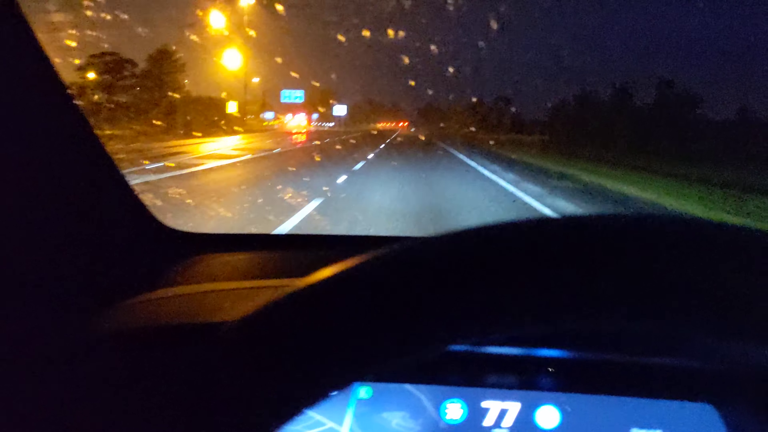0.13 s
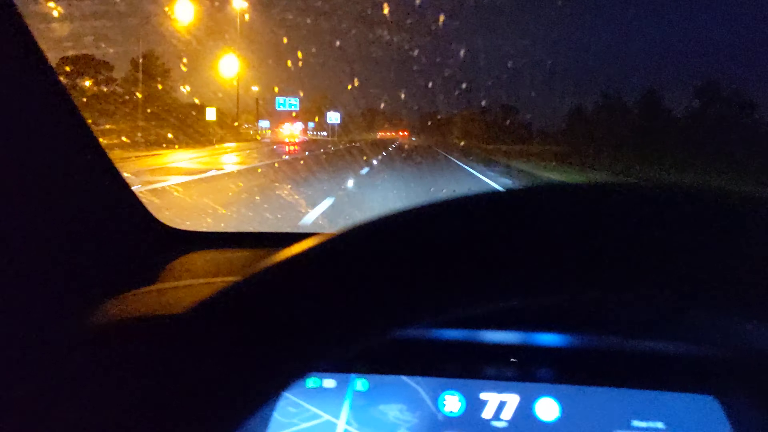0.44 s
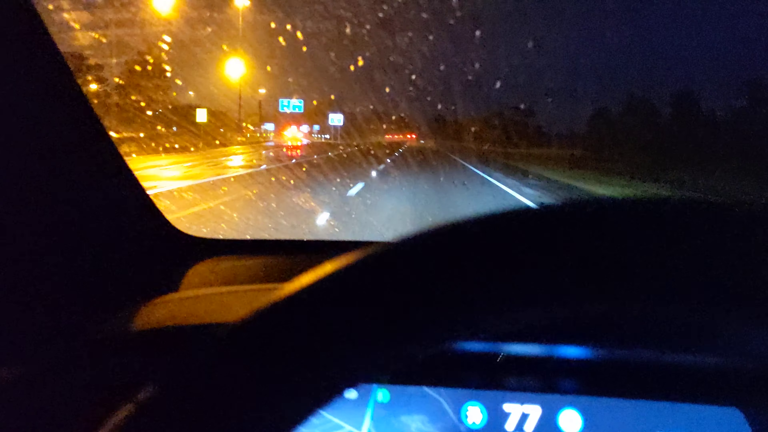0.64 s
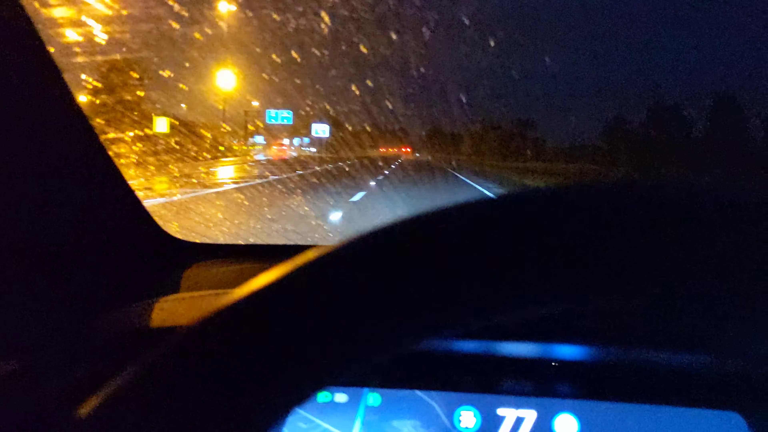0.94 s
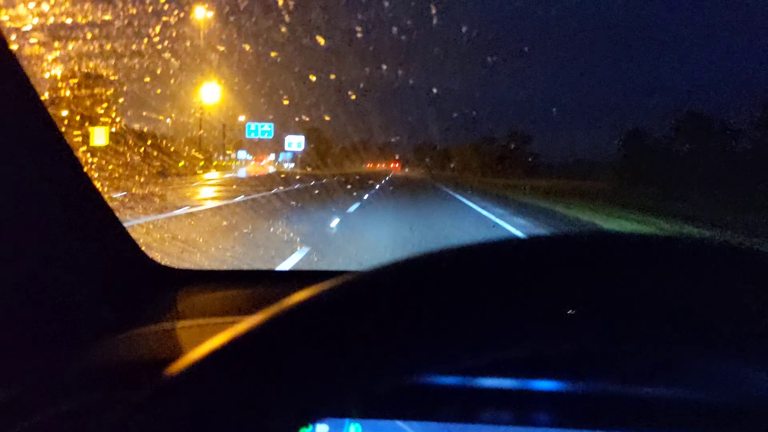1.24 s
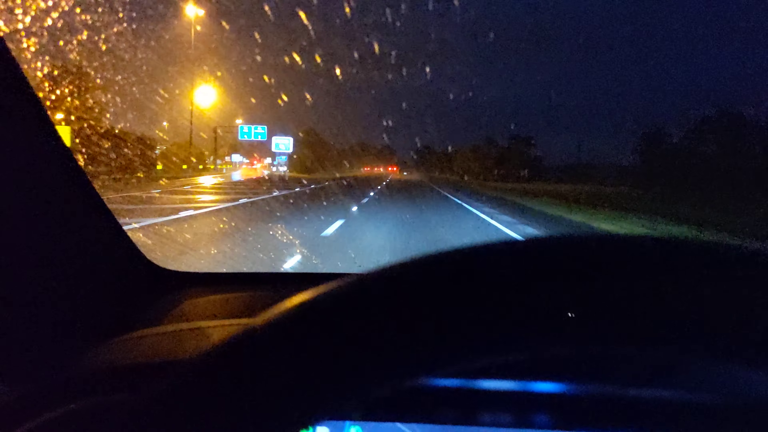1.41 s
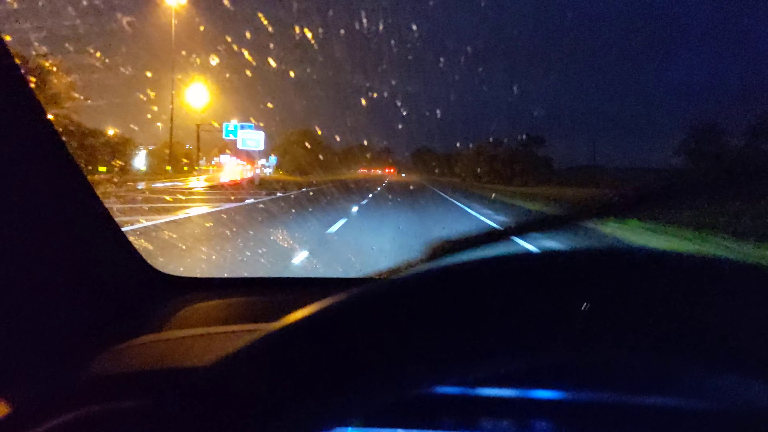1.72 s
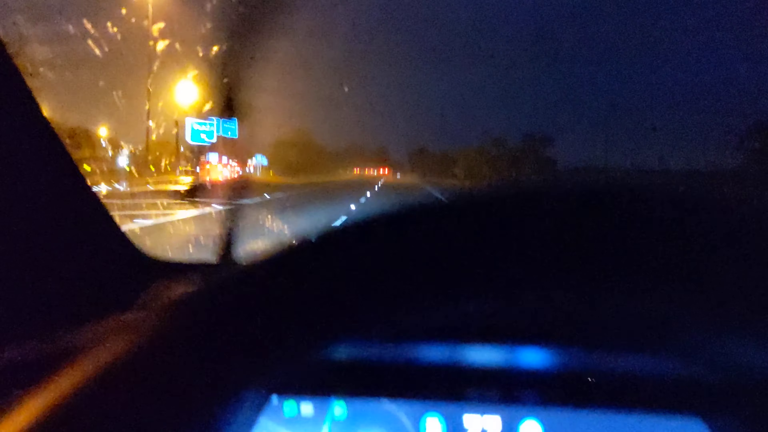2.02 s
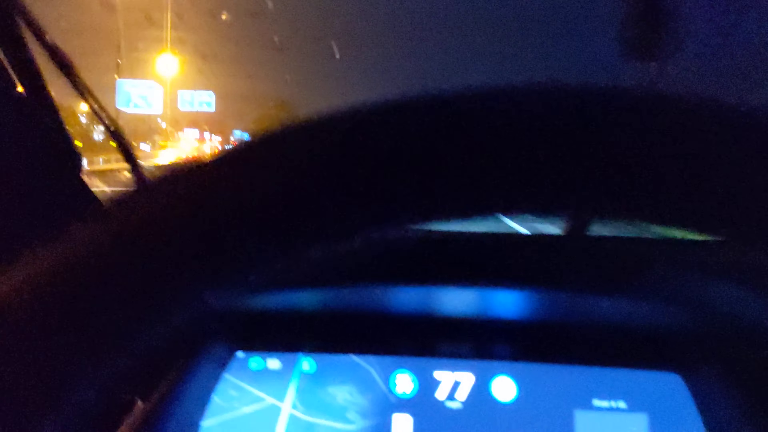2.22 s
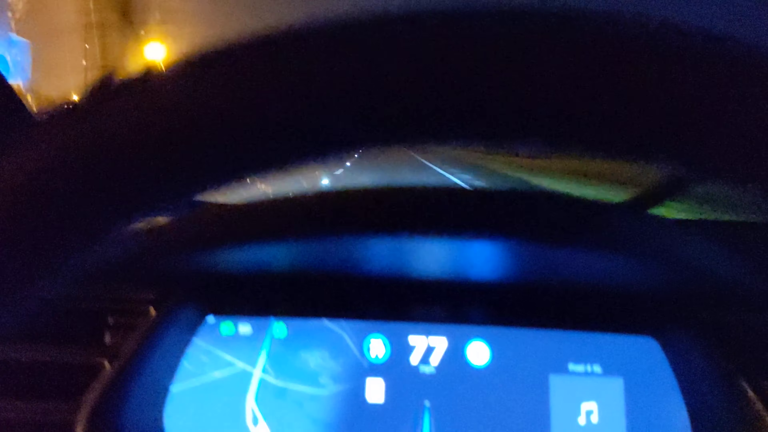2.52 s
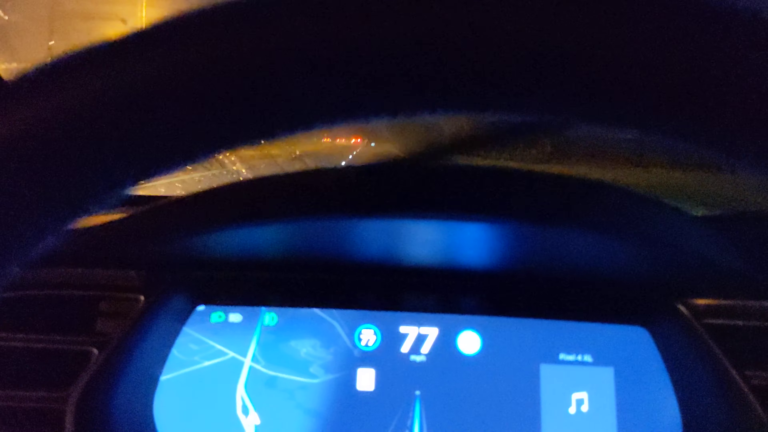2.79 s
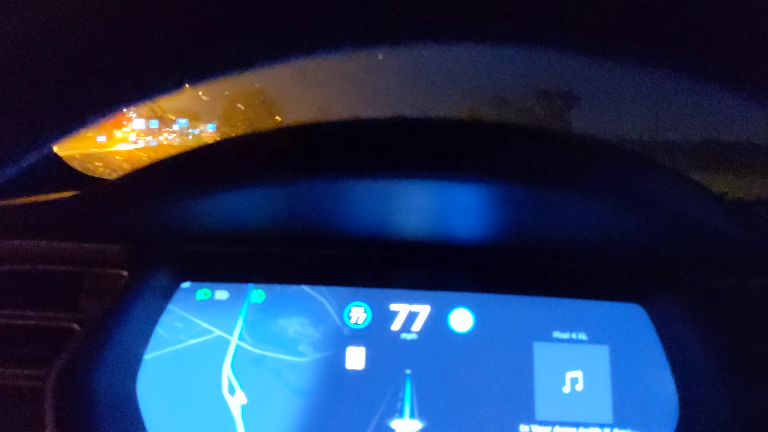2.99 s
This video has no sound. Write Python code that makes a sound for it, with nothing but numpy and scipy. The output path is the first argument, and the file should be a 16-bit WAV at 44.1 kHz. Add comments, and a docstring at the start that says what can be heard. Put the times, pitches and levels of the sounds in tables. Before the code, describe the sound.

Road noise inside a car at highway speed on a wet night, with light rain ticking

```python
"""Road noise in a car at highway speed on a wet night: shaped noise booms in the body and roars from
the tyres, and narrow-band resonances drone within it. Filtered noise makes the hiss of tyre spray.
Rain patters on the windscreen as random impulses that ring the glass and echo in the cabin, with
heavier splashes, each followed by decaying droplets. The right microphone is partly covered, likely
by a shifting hand: a moving resonance makes the treble of the water sound hollow there."""
import sys
import numpy as np
from scipy import signal
from scipy.fft import rfft, irfft, next_fast_len
from scipy.io import wavfile
from scipy.ndimage import uniform_filter1d, minimum_filter1d, map_coordinates

SR = 44100
rng = np.random.default_rng(int(sys.argv[2]) if len(sys.argv) > 2 else 0)


def log_audio(samples):
    """Write samples as a 16-bit WAV file to the path given in sys.argv[1]."""
    # one column per channel
    frames = np.atleast_2d(samples).T
    # limit to full scale, then quantise
    limited = np.clip(frames, -1, 1)
    pcm = np.round(limited * 32767).astype(np.int16)
    wavfile.write(sys.argv[1], SR, pcm)


N = 138915  # samples, 3.15 s


def amp(db):
    """Amplitude gain is ten to the power of a twentieth of the level in decibels."""
    return 10 ** (np.asarray(db) / 20)


def unit(x):
    """Normalisation: division by the root mean square gives rms 1."""
    return x / np.sqrt(np.mean(x ** 2) + 1e-20)


def along(points, hz):
    """Interpolate (f, value) rows on a logarithmic frequency axis."""
    f, value = np.transpose(points)
    return np.interp(np.log(hz + 1e-9), np.log(f + 1e-9), value)


def curve(rows):
    """Envelope: interpolate (t, value) rows linearly to one value per sample."""
    return np.interp(np.arange(N) / SR, *np.transpose(rows))


def wobble(rate):
    """Slow random modulation: a smooth spline through `rate` Gaussian knots a second."""
    knots = rng.standard_normal(N // 100)
    return map_coordinates(knots, [np.arange(N) * rate / SR])


def filtered(x, response):
    """Linear filtering: the spectrum times a frequency response, zero-padded against wrap-around."""
    m = next_fast_len(N + SR // 2)
    hz = np.fft.rfftfreq(m, 1 / SR)
    return irfft(rfft(x, m) * response(hz), m)[..., :N]


def road_noise(spectrum):
    """Partial coherence: independent mid and side noise, nearly mono in the bass, with mid rms 1."""
    # correlation of the two microphones: f/Hz, likeness (0-1)
    likeness = [(30, .98), (60, .9), (130, .8), (180, .5), (260, .27), (380, .76), (550, .69), (790, .83),
                (1140, .34), (1650, 0)]
    # level difference of the microphones: f/Hz, left minus right/dB
    balance = [(30, 4), (55, 1.5), (80, 4.5), (140, 6), (165, 4.5), (195, -12), (260, 0), (340, 1),
               (440, -4), (600, 1.8), (800, 2), (1200, 0.5), (2000, -1.5)]

    def mid_side(hz):
        angle = np.arccos(np.clip(along(likeness, hz), -1, 1)) / 2
        return amp(along(spectrum, hz)) * [np.cos(angle), np.sin(angle)]

    mid, side = filtered(rng.standard_normal((2, N)), mid_side)
    pair = np.array([mid + side, mid - side])
    pair = filtered(pair, lambda hz: amp(np.outer([.5, -.5], along(balance, hz))))
    return pair / pair.mean(0).std()


def drones():
    """Resonance under random excitation: the road keeps narrow modes ringing at a wavering level."""
    # cabin and tyre resonances: f/Hz, half-width/Hz, level/dB, left minus right/dB
    modes = [(86.1, 7.1, -22.5, 5.5), (129.4, 7.4, -26, 10.5), (317, 14, -39.5, 4), (399.5, 14.3, -39, 3),
             (593, 12.3, -47.5, -1), (719.4, 20, -42, 1), (941, 11.5, -47, 2), (1190, 18, -52.5, 10)]
    steadiness = 0.41  # 0 = swells like noise, 1 = nearly even level
    out = np.zeros((2, N))
    for centre_hz, width_hz, db, lean_db in modes:
        noise = rng.standard_normal(N)
        band = filtered(noise, lambda hz: 1 / (1 + ((hz - centre_hz) / width_hz) ** 4))
        ring = signal.hilbert(unit(band), next_fast_len(N))[:N]
        power = np.abs(ring) ** 2
        even = unit(ring.real / (power + 0.043) ** (steadiness / 2))
        out += amp(db + lean_db * np.array([[.5], [-.5]])) * even
    return out


def road():
    """Structure-borne sound: rough asphalt shakes the cabin and makes the tyres roar."""
    # cabin boom, relative spectral density: f/Hz, level/dB
    boom_spectrum = [(15, -44), (22, -20), (32, -8.5), (41, 0.5), (50, 3.5), (66, 3), (77, -4), (105, -2),
                     (145, -4.5), (165, -7.5), (188, -16.5), (260, -21.5), (340, -54), (570, -120)]
    # tyre roar through the body panels, relative spectral density: f/Hz, level/dB
    roar_spectrum = [(140, -26), (240, -4.5), (280, -5.5), (318, 0.5), (403, -1.5), (429, -0.5),
                     (466, -16.5), (529, -13), (584, -14.5), (628, -10), (713, -5), (817, -15), (953, -12),
                     (1080, -20), (1230, -15), (1400, -18), (1640, -28), (2100, -34), (2730, -73),
                     (4620, -120)]
    boom_db, roar_db, roar_sway_db = -18, -28, 0.88
    right_lag_s = .00008  # the sound reaches the right microphone a little later
    boom = amp(boom_db) * road_noise(boom_spectrum)
    roar = amp(roar_db + roar_sway_db * wobble(14)) * road_noise(roar_spectrum)
    # a delay is a phase that falls linearly with frequency
    return filtered(boom + roar + drones(),
                    lambda hz: np.exp(-2j * np.pi * np.outer([0, right_lag_s], hz)))


def through_glass(x, size=1024):
    """Minimum phase: the folded cepstrum gives the windscreen a causal ring of unit energy."""
    # rain and spray heard through the windscreen, relative response: f/Hz, level/dB
    glass = [(300, -3), (1000, 4.5), (2000, -2.45), (2550, 0.85), (3300, -5), (3900, -5.5), (4900, -12),
             (5400, -7.5), (6300, -10), (7050, -8.5), (7700, -12.1), (8600, -12), (9600, -9),
             (10500, -13.5), (11700, -11), (13000, -12), (14000, -18.7), (15600, -17.5)]
    hz = np.fft.rfftfreq(size, 1 / SR)
    cepstrum = irfft(np.log(amp(along(glass, hz))))
    cepstrum[1:size // 2] *= 2
    cepstrum[size // 2 + 1:] = 0
    ring = irfft(np.exp(rfft(cepstrum)))
    return signal.fftconvolve(x, ring[None] / np.linalg.norm(ring), axes=1)[:, :N]


def spray(rain_db):
    """Broadband turbulence noise: water thrown up by the tyres hisses smoothly."""
    # spray on top of the glass response: f/Hz, level/dB
    spray_tilt = [(3500, 0.5), (7000, -3), (12000, -2)]
    spray_db, follows = -41, 0.25  # mean level; share of the rain's swings in dB
    hiss = through_glass(rng.standard_normal((2, N)))
    hiss = filtered(hiss, lambda hz: amp(along(spray_tilt, hz)))
    return unit(hiss) * amp(spray_db + follows * (rain_db - rain_db.mean()))


def impacts(times, sizes, count=8):
    """Impulse response: drops strike zones of the glass, each with its own delays and cabin echo."""
    # drops on top of the glass response: f/Hz, level/dB
    drop_tilt = [(1000, -2), (3000, -3), (7000, -1)]
    t60_s, echo_db = 0.017, -1  # reverberation time; echo energy relative to the direct sound
    t = np.arange(SR // 10) / SR
    out = np.zeros((2, N))
    for zone in range(count):
        echo = rng.standard_normal((2, len(t))) * amp(-60 * t / t60_s)
        echo *= amp(echo_db) / np.linalg.norm(echo[0])
        echo[[0, 1], rng.integers(0, 16, 2)] += 1  # direct sound, delayed separately at each microphone
        samples = np.abs(times[zone::count] * SR).astype(int)
        hits = np.bincount(samples, sizes[zone::count], N)[:N]
        out += signal.fftconvolve(hits[None], echo, axes=1)[:, :N]
    return filtered(through_glass(out), lambda hz: amp(along(drop_tilt, hz)))


def patter(rain_db):
    """Random arrivals: many fine drops of uneven size fall in quick flurries."""
    drops_per_s, spread_db = 900, 3
    patter_db, flurry_db = 8, 2.5  # level above the rain curve; depth of the flurries
    flurries = amp(rain_db + patter_db + flurry_db * wobble(35.08))
    when, chance = rng.random((int(drops_per_s * N / SR), 2)).T
    sizes = amp(-spread_db * np.log(chance + 0.03))
    return unit(impacts(when * N / SR, sizes)) * flurries


def splashes(count=56):
    """Decaying impulse train: a big drop hits, and a shower of ever smaller droplets follows."""
    # heavier splashes: t/s, relative level/dB, decay time of the droplets/s
    big_drops = [(.492, -35, .01), (0.575, -36, 0.0066), (0.596, -35.5, 0.024), (0.619, -31.5, 0.013),
                 (.895, -39, 0.023), (1.122, -36, .012), (1.361, -35, .012), (1.508, -36, 0.02),
                 (1.68, -34.5, 0.028), (1.718, -37, .016), (1.794, -44.5, 0.0017), (1.979, -34.5, 0.038),
                 (2.243, -33, 0.013), (2.292, -34, .015), (2.39, -32.5, 0.013), (2.527, -33.5, 0.041),
                 (2.634, -33, 0.021), (2.767, -34.5, 0.008), (2.924, -37, 0.0084), (2.97, -33, .005),
                 (3.015, -32, 0.0092)]
    splash_db, droplet_db = 12.5, 1  # added to every level; extra for the droplets before decay
    droplets_per_s = 1000
    s, db, decay_s = np.transpose(big_drops)[:, :, None]
    later = np.arange(count) > 0  # the first impact has no delay
    gaps = later * rng.exponential(size=(len(s), count))
    delay = np.cumsum(gaps, axis=1) / droplets_per_s
    sizes = amp(db + splash_db + later * droplet_db) * np.exp(-delay / decay_s)
    return impacts((s + delay).ravel(), sizes.ravel())


def covered(x):
    """Cavity resonance: a small cavity boosts its mode, weakens the band above and shifts with the grip."""
    # cavity over the right microphone: t/s, resonance f/Hz, added gain/dB
    cavity = [(.25, 5760, 1), (.42, 5600, 2), (.52, 4400, 1), (.6, 3750, 3), (.75, 3370, 3), (.92, 3940, 3),
              (1.1, 4570, 0.5), (1.6, 4700, 0), (2.0, 4950, 1.5), (2.35, 4750, 0), (2.66, 3700, -0.5),
              (2.9, 3800, -.5), (3.08, 5000, 0)]
    # cavity response: f as a multiple of the resonance, level/dB
    cavity_shape = [(.25, -0.5), (.5, .5), (.75, 7.5), (1, 9), (1.28, 2.5), (1.7, -12), (2.2, -12),
                    (2.9, -8.5), (3.8, -18), (5, -28)]
    # colour of the right port: f/Hz, level/dB
    port = [(1600, -1), (2000, -0.5), (2500, 1), (3000, 4.5), (3450, 3), (3950, 6), (4800, 3.5), (5500, 2),
            (8000, -0.5), (10000, 4.5), (11600, 8), (15000, 10)]
    hz, t, z = signal.stft(x, SR, nperseg=256)
    s, resonance_hz, gain_db = np.transpose(cavity)
    multiple = hz[:, None] / np.interp(t, s, resonance_hz)
    added_db = np.interp(t, s, gain_db) / (1 + multiple ** 6)  # fades out above the resonance
    db = along(cavity_shape, multiple) + added_db + along(port, hz)[:, None]
    return signal.istft(z * amp(db), SR)[1][:N]


def scene():
    """Superposition: road noise adds to the water sounds, and only the right water is covered."""
    # strength of the rain: t/s, relative level/dB
    rain = [(.25, -51.5), (.6, -55), (.73, -55), (.9, -52), (1.15, -51.5), (1.26, -53), (1.7, -53),
            (2.3, -52), (2.6, -56.5), (2.85, -54.5), (3.1, -54.5)]
    rain_db = curve(rain)
    rumble = road()
    left, right = spray(rain_db) + splashes() + patter(rain_db)
    return rumble + np.array([left, covered(right)])


def record(dry):
    """Peak limiting and band limiting: the recorder fades in, eases down peaks and cuts the top."""
    # fade-in: t/s, gain/dB
    fade_in = [(0, -94), (.148, -60), (.175, -26), (.2, -8), (.22, 2), (.245, 2)]
    ceiling_db, hold_s, top_hz = -1.3, .012, 15750
    x = dry * amp(curve(fade_in))
    hold = int(hold_s * SR)
    needed = np.minimum(1, amp(ceiling_db) / (np.abs(x).max(0) + 1e-9))
    gain = uniform_filter1d(minimum_filter1d(needed, hold), hold)
    return filtered(x * gain, lambda hz: np.clip((top_hz - hz) / 100 + .5, 0, 1))


dry = scene()
out = record(dry)
log_audio(out)
```